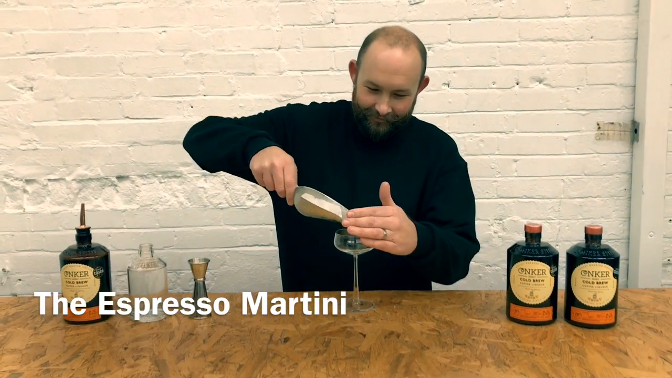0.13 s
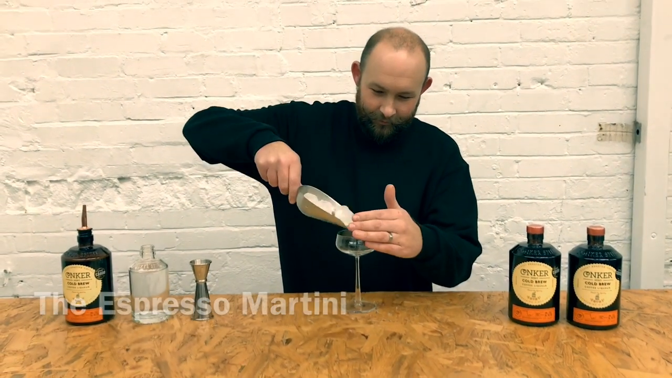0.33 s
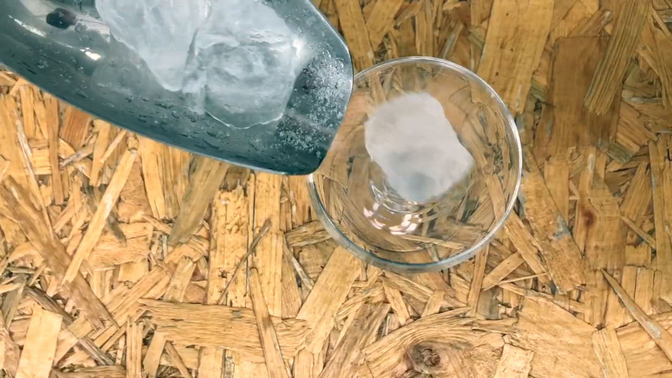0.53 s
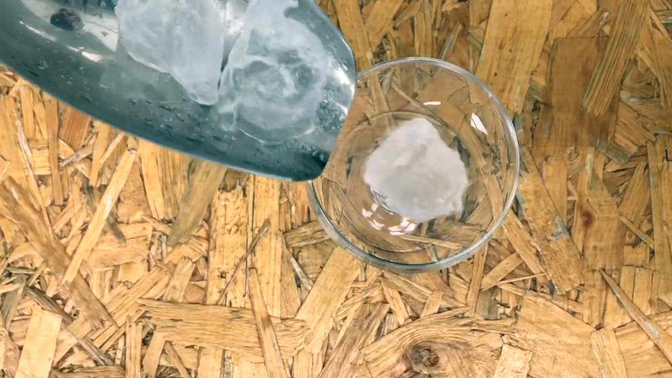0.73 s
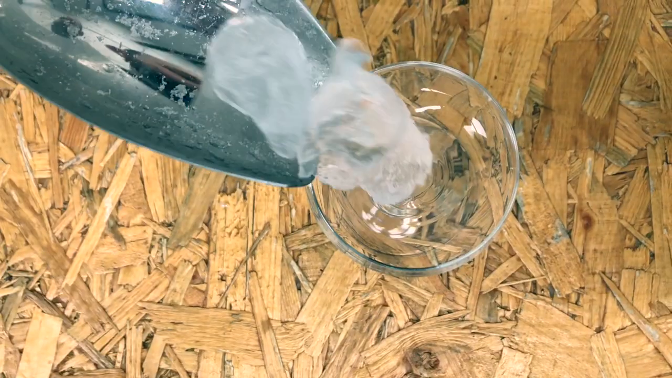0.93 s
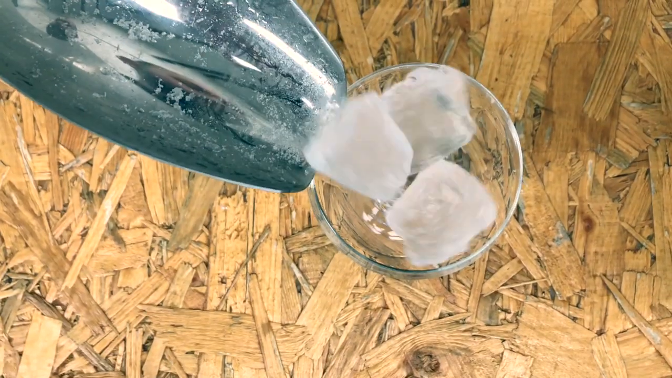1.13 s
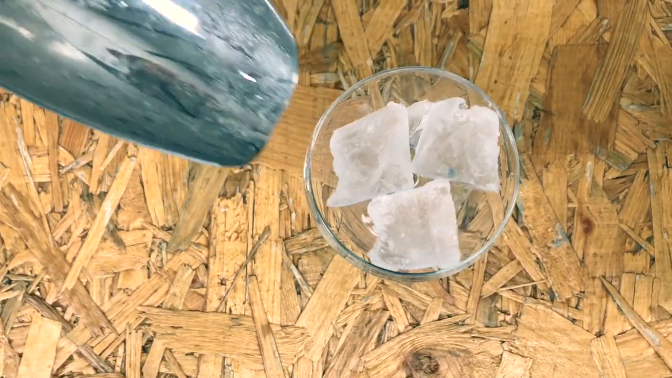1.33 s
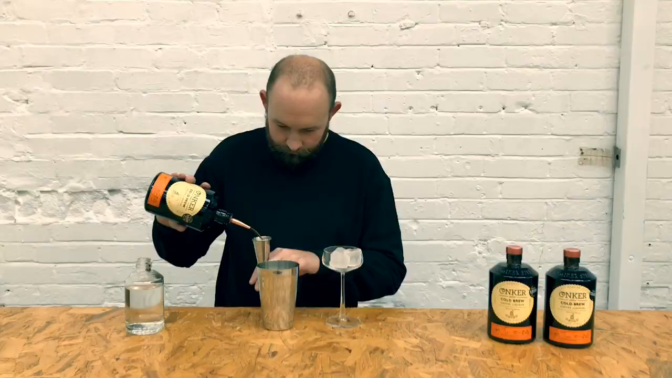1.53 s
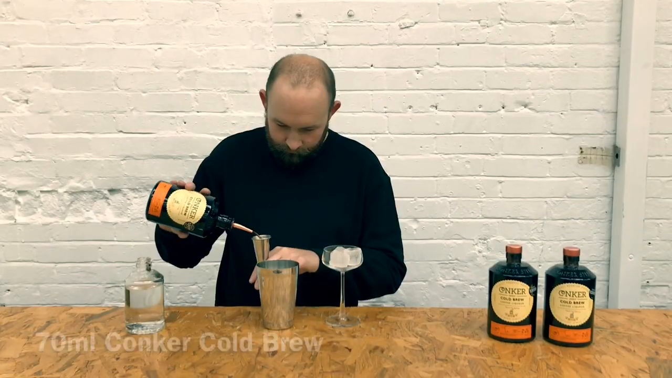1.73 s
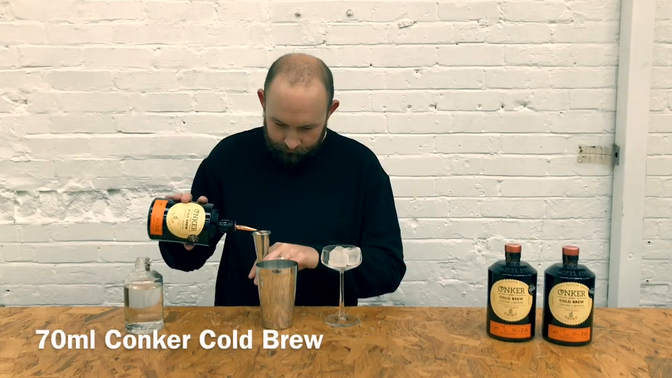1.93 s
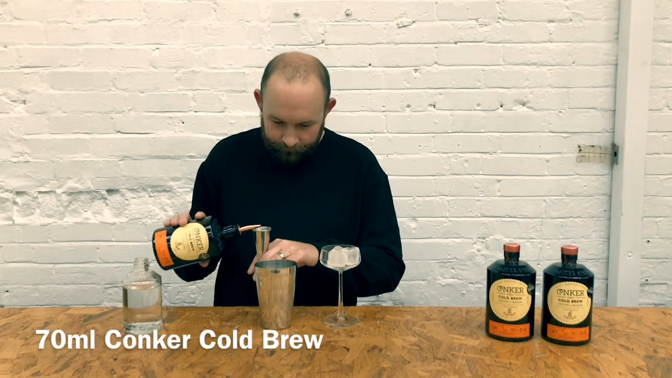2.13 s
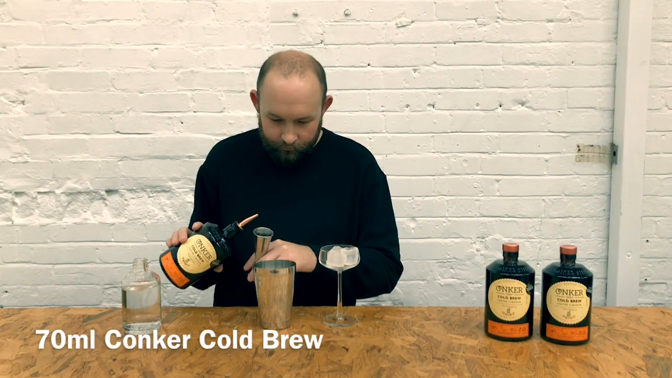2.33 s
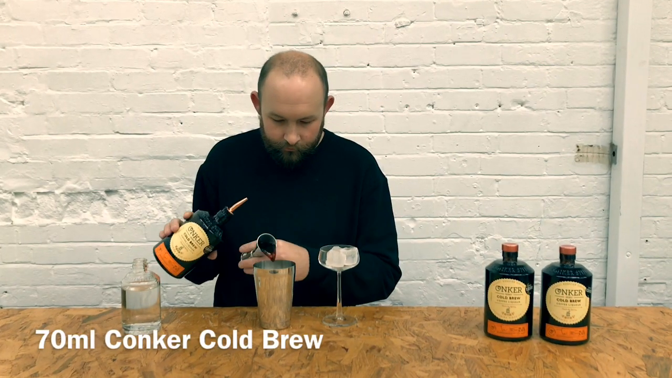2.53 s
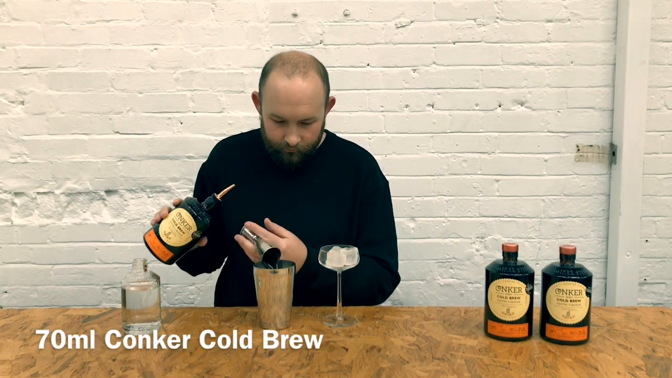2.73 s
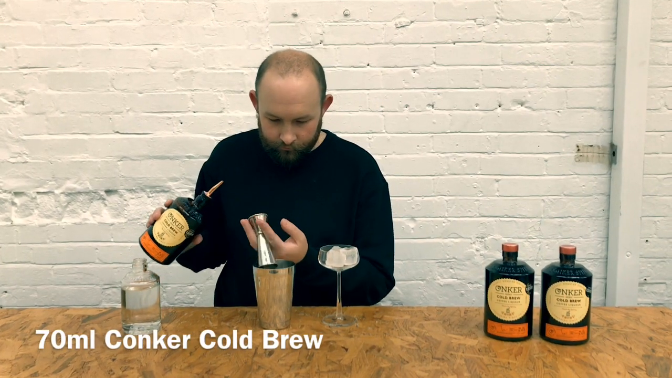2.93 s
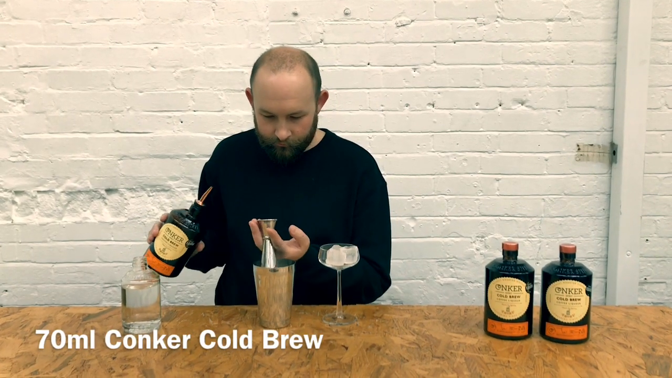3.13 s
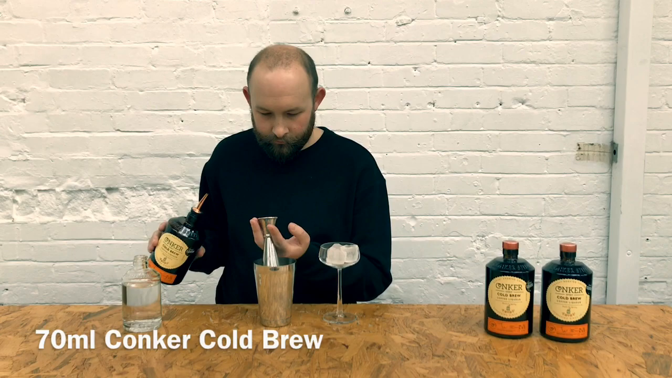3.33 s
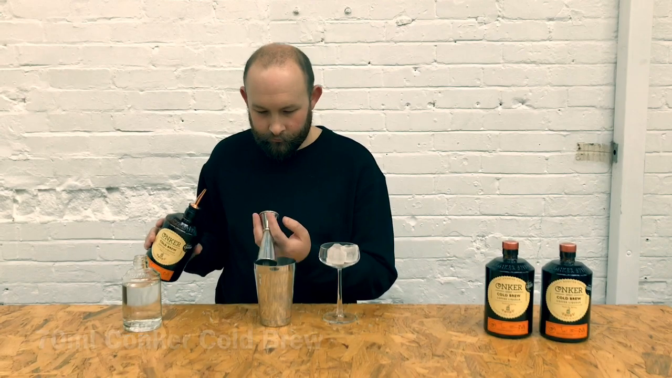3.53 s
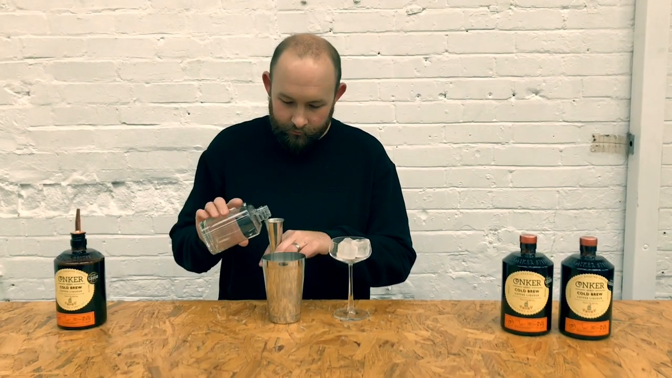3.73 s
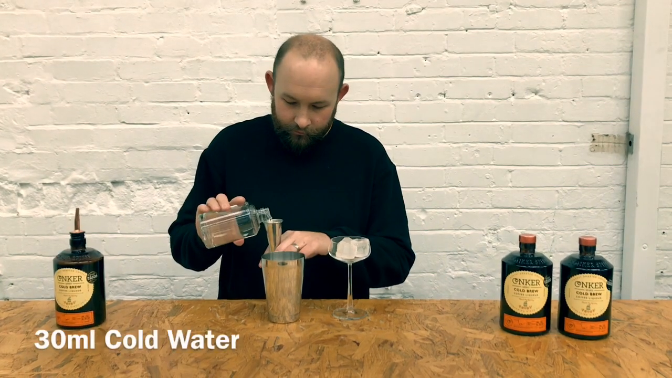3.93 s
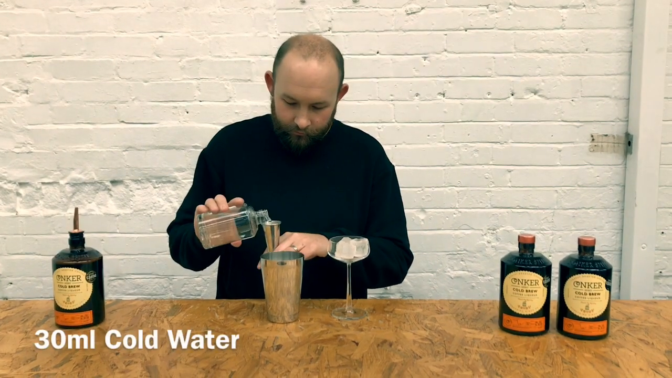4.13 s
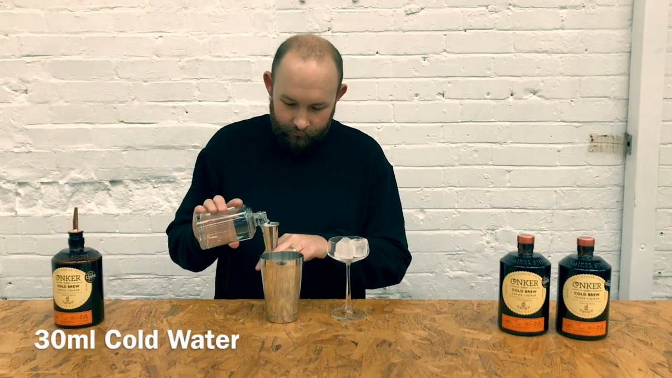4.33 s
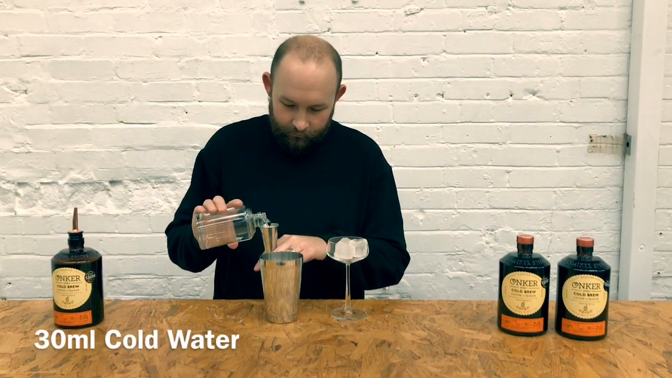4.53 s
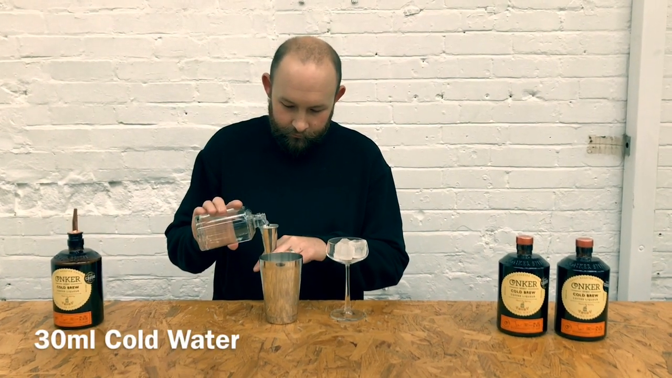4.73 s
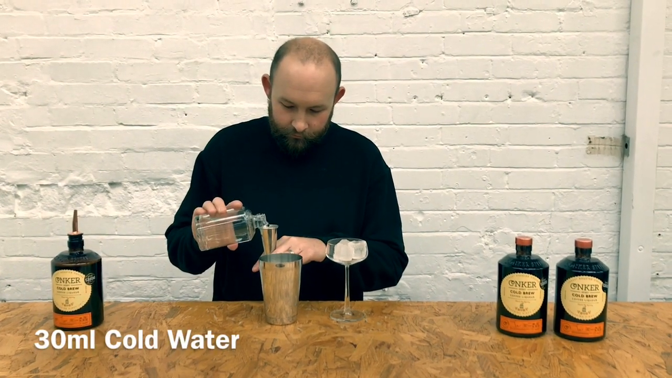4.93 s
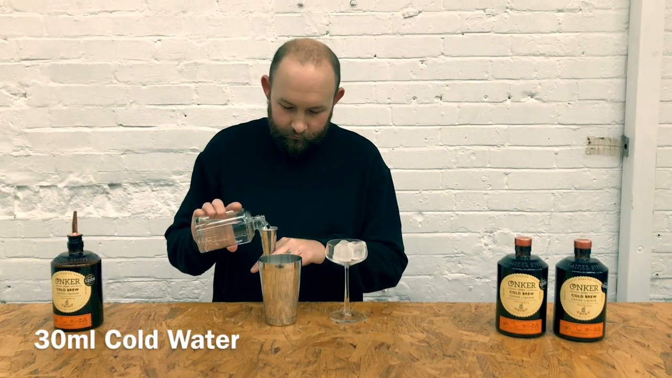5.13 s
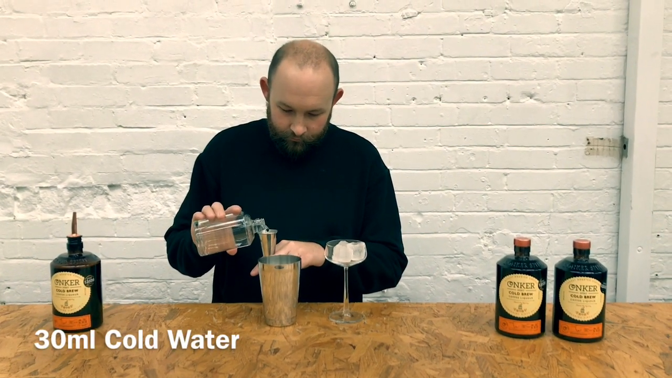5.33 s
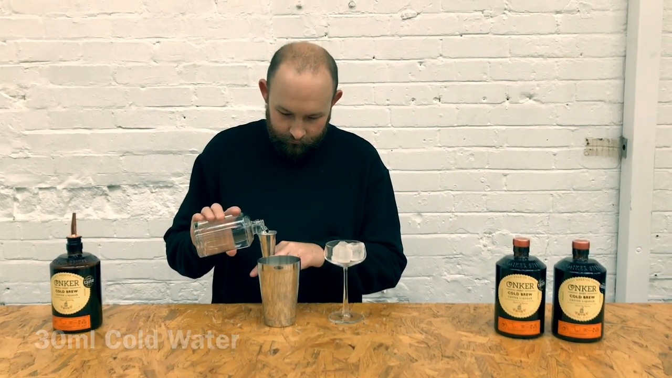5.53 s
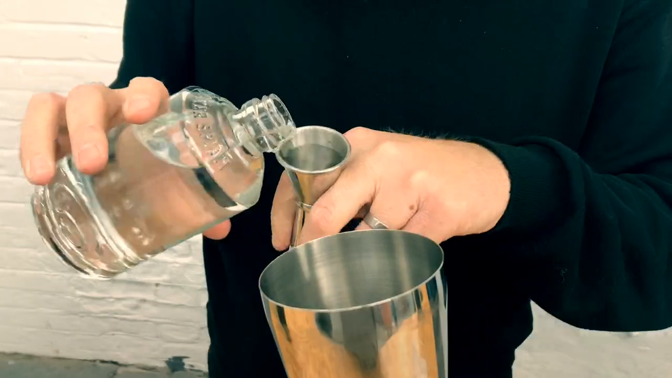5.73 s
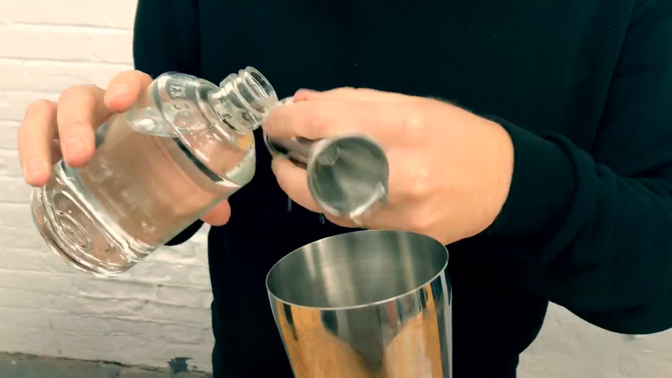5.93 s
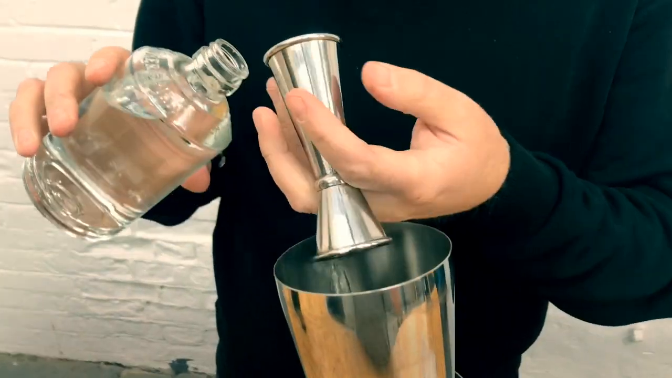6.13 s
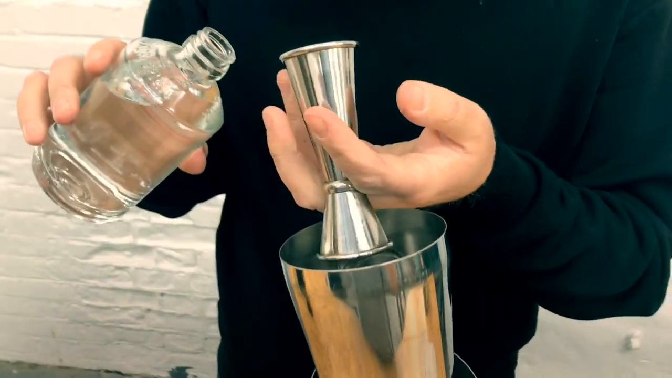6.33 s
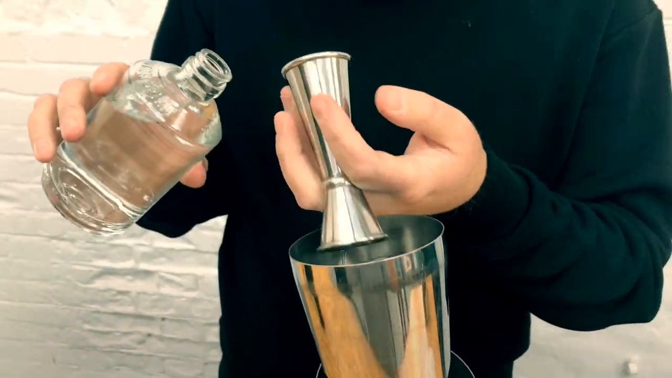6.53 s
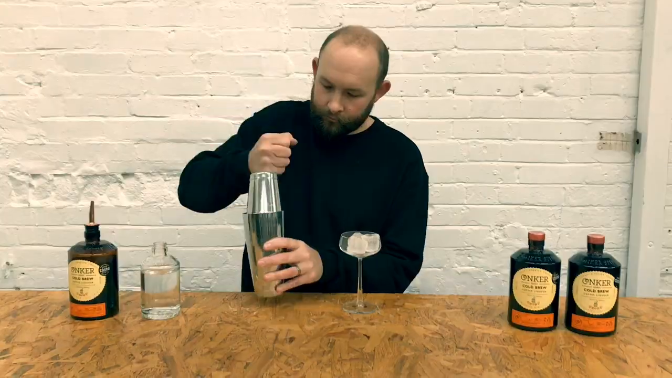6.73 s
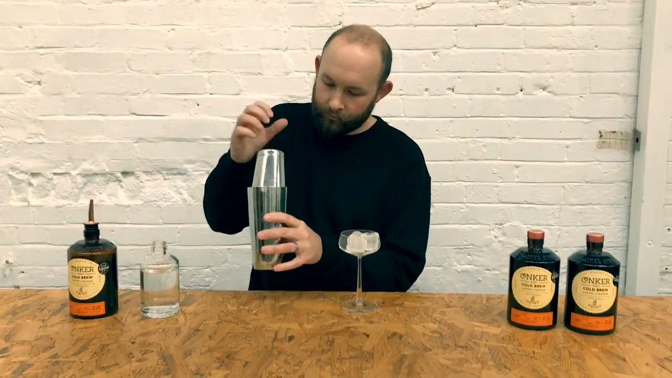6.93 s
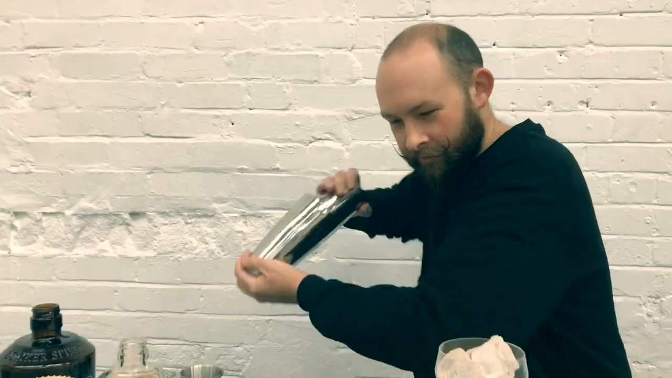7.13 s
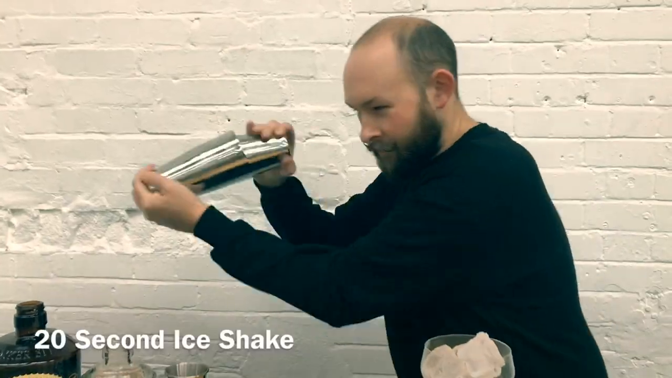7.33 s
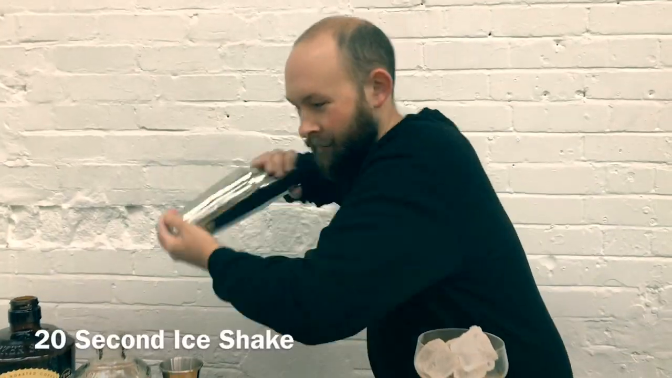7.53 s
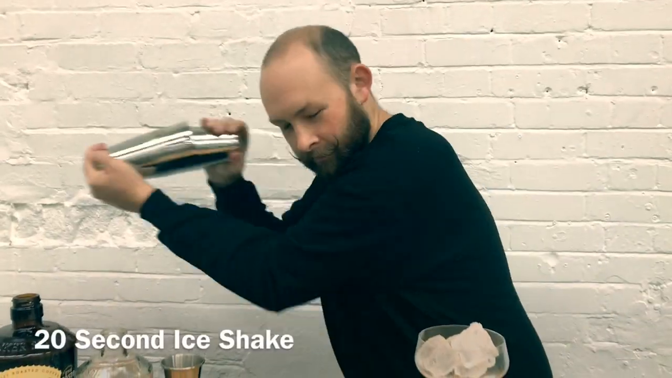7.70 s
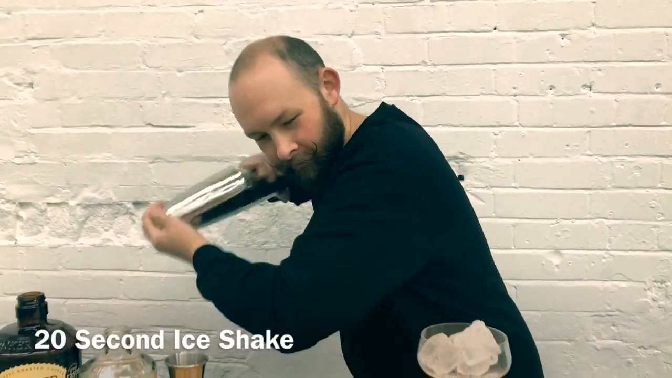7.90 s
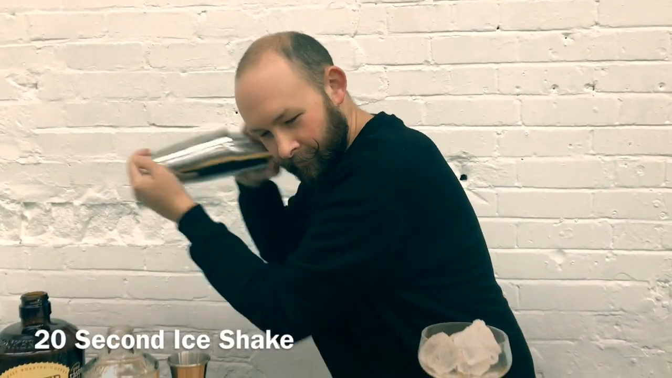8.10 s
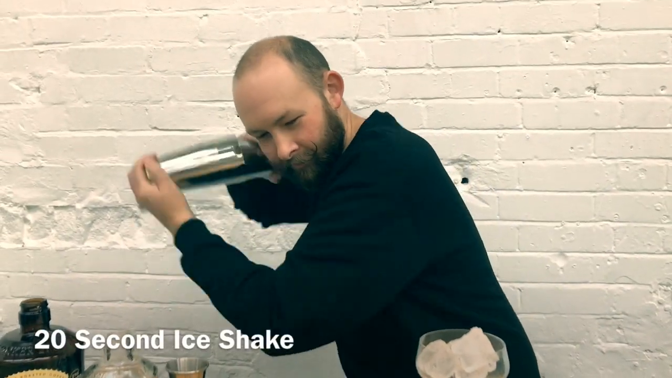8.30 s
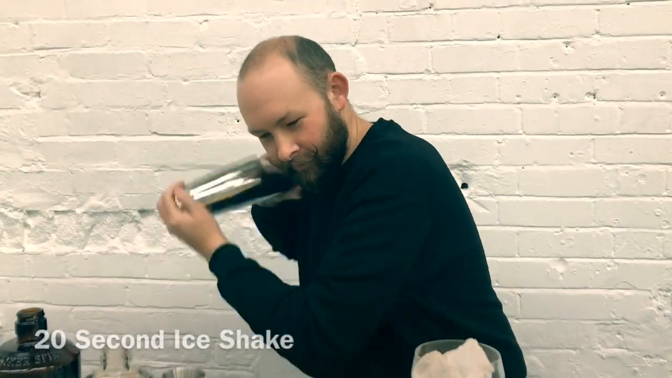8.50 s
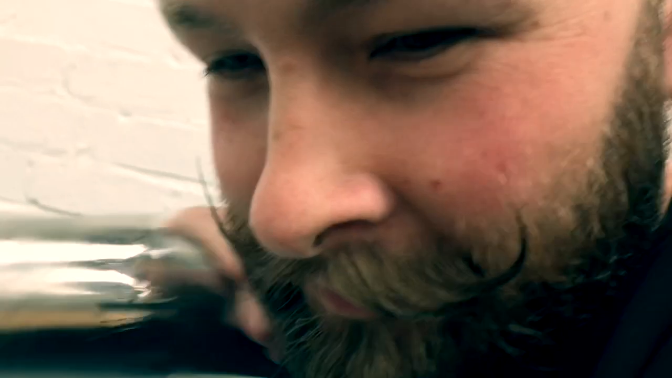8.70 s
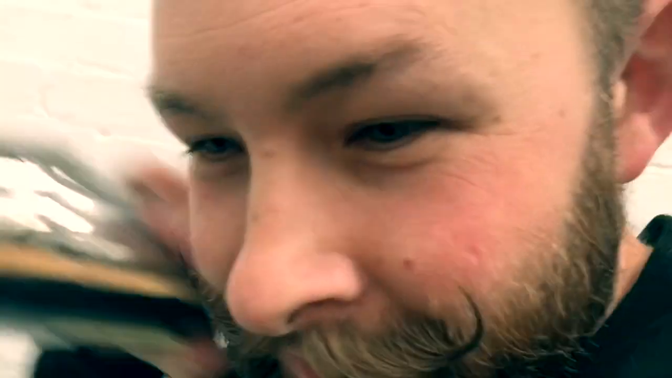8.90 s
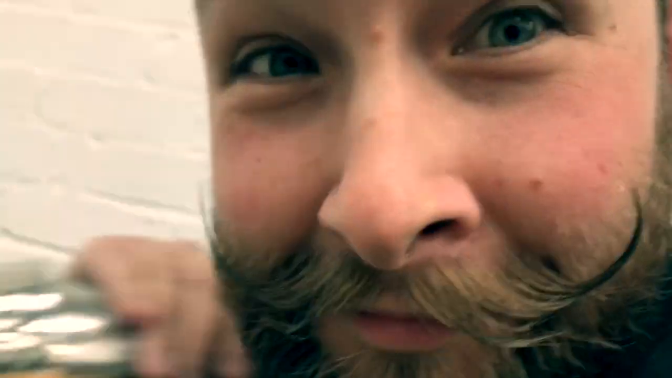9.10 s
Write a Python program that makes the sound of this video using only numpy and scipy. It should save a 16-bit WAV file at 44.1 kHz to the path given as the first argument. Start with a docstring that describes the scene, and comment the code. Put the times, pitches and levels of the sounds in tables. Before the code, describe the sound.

Ice cubes slide off a metal scoop and clink into a stemmed glass, liquid trickles through a steel measure, then ice rattles hard in a shaker.

```python
"""Ice is the main sound: it slides off a metal scoop, clinks into a stemmed glass, and is later shaken hard.
Liqueur and water run through a steel jigger into a shaker; its lid is slapped on, then the load hits
the two ends by turns, about eleven blows a second. Contacts are noise bursts, struck objects are dying
tones, and liquid is made of rising bubble tones and patter. Faint air and a room surround it all.
Eight short sections are joined by quick fades. Table levels are relative; the functions trim them."""
import sys
import numpy as np
from scipy import signal
from scipy.io import wavfile

SR = 44100
rng = np.random.default_rng(int(sys.argv[2]) if len(sys.argv) > 2 else 0)


def store_pcm(level_fs):
    """Save levels as 16-bit WAV."""
    pcm = np.round(np.clip(level_fs, -1, 1) * 32767).astype(np.int16)
    wavfile.write(sys.argv[1], SR, np.atleast_2d(pcm).T)


N = 403956
TIME = np.arange(N) / SR
AGE = TIME[:SR // 2]  # time since a blow, in s


def amp(db):
    """Turns decibels into a gain."""
    return 10 ** (np.asarray(db) / 20)


def unit(x):
    """Scales a sound to rms 1."""
    return x / np.sqrt(np.mean(x ** 2) + 1e-20)


def blow(x):
    """Scales a struck sound to rms 1 over its first hundredth of a second."""
    return x / np.sqrt(np.mean(x[:441] ** 2) + 1e-20)


def read(points, hz):
    """Reads between the points of a table on a log-frequency axis."""
    f, value = np.transpose(points)
    return np.interp(np.log(hz + 1), np.log(np.sort(f) + 1), value)


def add(mix, s, sound):
    """Lays a sound into the mix at time s."""
    part = mix[max(round(s * SR), 0):][:len(sound)]
    part += sound[:len(part)]


def fade(t, t60):
    """Falls 60 dB in t60 seconds."""
    return np.exp(-np.log(1000) * t / np.maximum(t60, 1e-4))


def swell(start, length, rise_s, t60):
    """Rises from start, and begins to die away once length has passed."""
    age = np.maximum(TIME - start, 0)
    rise = np.minimum(age / max(rise_s, 1e-3), 1)
    return rise * fade(np.clip(age - length, 0, 2 * t60), t60)


def colour(x, spectrum, size=4096):
    """Causal filter with the given spectrum that keeps the power of white noise."""
    hz = abs(np.fft.fftfreq(size, 1 / SR))
    log_gain = np.log(amp(read(spectrum, hz)) + 1e-5)
    # the Hilbert transform of the log gain supplies the phase of a causal filter
    taps = np.fft.ifft(np.exp(np.conj(signal.hilbert(log_gain)))).real[:size // 2]
    return signal.oaconvolve(x, taps / np.linalg.norm(taps))[:len(x)]


def ring(modes, scatter_db):
    """A struck object is a sum of dying tones; each blow shares its energy a little differently."""
    hz, db, t60 = np.transpose(modes)[:, :, None]
    signs = rng.choice([-1, 1], hz.shape)
    gains = signs * amp(db + scatter_db * rng.standard_normal(hz.shape))
    tones = gains * fade(AGE, t60) * np.sin(2 * np.pi * hz * AGE)
    return blow(tones.sum(0))


def two_spots(modes):
    """Gives the tones of one object as they sound from each of two strike points."""
    hz, t60, first_db, second_db = np.transpose(modes)
    return np.c_[hz, first_db, t60], np.c_[hz, second_db, t60]


def crack(t60):
    """A contact makes a short burst without pitch."""
    return blow(rng.standard_normal(len(AGE)) * fade(AGE, t60))


def chink(t60, count=14):
    """A lump of ice has its own short, irregular tones."""
    hz = rng.uniform(3000, 15500, count)
    tone_t60 = t60 * rng.uniform(.5, 1.5, count)
    return ring(np.c_[hz, np.zeros(count), tone_t60], scatter_db=3)


def collisions(per_s, spread_db, t60, count=12):
    """A dense rain of small contacts, drawn from a dozen different bursts."""
    at = rng.integers(0, N, (count, int(per_s * N / SR / count) + 1))
    out = np.zeros(N)
    for places in at:
        size = np.minimum(rng.exponential(1, len(places)), 3.5)
        train = np.zeros(N)
        train[places] = amp(spread_db * size)
        out += signal.oaconvolve(train, crack(t60)[:SR // 50])[:N]
    return unit(out)


def bubble(hz, t60, rise, swell_s):
    """An air pocket rings and climbs in pitch as it nears the surface."""
    t = AGE[:SR // 4]
    tone = np.sin(2 * np.pi * hz * (t + rise * t ** 2 / 2))
    tone = tone * fade(t, t60) * (1 - np.exp(-t / swell_s))
    return tone / abs(tone).max()


# The sections, where room share grows with distance:
# t/s, room tone level/dB, close tone level/dB, room share level/dB
TAKES = [(0, -62, -70, -0.5), (0.591, -55.5, -78, -15), (1.62, -62.5, -69, 0.5), (3.679, -59.5, -70, -2.5),
         (5.717, -66, -52, -20), (6.715, -57, -79, -14), (7.182, -56.5, -78, -14.5),
         (8.751, -54, -55, -22.5)]


def by_take(column):
    """A setting holds for the length of each section."""
    start = np.transpose(TAKES)[0]
    section = np.maximum(np.searchsorted(start, TIME, "right") - 1, 0)
    return amp(column[section])


# Spectrum of the room's air: f/Hz, level/dB
ROOM_TONE = [(15, -37.5), (25, -12.5), (54, -6), (101, -15.5), (176, -20), (293, -21.5), (344, -33),
             (404, -29.5), (529, -28.5), (1310, -45.5), (2430, -38), (3630, -39.5), (15000, -46.5)]
# Spectrum of the same air heard from close by: f/Hz, level/dB
CLOSE_TONE = [(15, -29), (25, -2), (71, 0), (224, -5.5), (264, -8), (301, -14.5), (363, -8.5), (475, -12.5),
              (1240, -12.5), (1860, -22.5), (15000, -47)]


def air():
    """Steady noise of the air, blended from a room colour and a close colour in each section."""
    _, far_db, close_db, _ = np.transpose(TAKES)
    far, close = rng.standard_normal((2, N))
    return by_take(far_db) * colour(far, ROOM_TONE) + by_take(close_db) * colour(close, CLOSE_TONE)


def sliding(slides):
    """How hard the ice is sliding at each moment."""
    rise_s, t60 = 0.012, .3
    return sum(amp(db) * swell(s, length, rise_s, t60) for s, length, db in slides)


# Ice striking the scoop: t/s, tick level/dB, ring level/dB
SCOOP_HITS = [(0.3357, -54.5, -62), (0.4807, -35, -60), (0.6038, -37, -38), (0.8744, -39, -43.5),
              (0.9238, -17, -21), (0.9392, -26, -30), (0.9617, -19, -19.5)]
# Tones of the scoop: f/Hz, level/dB, t60/s
SCOOP_MODES = [(1450, -12, .08), (3738, 0, .1), (3960, -6, .06), (4200, -5, .07), (4400, -7, .06),
               (5772, -11, .15), (6821, -9, .09), (8570, -15, .1), (9593, -14, .1), (10640, -14, .12),
               (11980, -14, .1), (13050, -11, .12)]
# Cubes sliding down the scoop: start t/s, length t/s, level/dB
SLIDES = [(0.321, 0.051, -58), (0.478, 0.0096, -48.5), (0.597, 0.016, -45), (0.87, 0.096, -43),
          (0.918, .05, -38.5)]
# Spectrum of ice scraping on the scoop: f/Hz, level/dB
SCRAPE = [(300, -15.5), (1000, -2.5), (2500, -6), (4100, -1.5), (5200, -5), (8000, -6.5), (12500, -7.5),
          (16000, -13)]
# Spectrum of a tick on metal, for scoop and jigger: f/Hz, level/dB
TICK = [(200, -16), (700, -8.5), (1800, -8.5), (3000, -0.5), (5000, 0), (8000, -8.5), (12000, -10.5),
        (16000, -6.5)]


def scoop():
    """Cubes scrape down the scoop and strike its sides; rubbing and blows excite the same tones."""
    ticks, rings = np.zeros((2, N))
    for s, tick_db, ring_db in SCOOP_HITS:
        add(ticks, s, amp(tick_db - 10.5) * crack(t60=0.06))
        add(rings, s, amp(ring_db) * ring(SCOOP_MODES, scatter_db=4.5))
    friction = collisions(per_s=1800, spread_db=6.5, t60=0.0053)
    singing = unit(signal.oaconvolve(friction, ring(SCOOP_MODES, scatter_db=0))[:N])
    scrape = sliding(SLIDES) * (amp(-2.0) * colour(friction, SCRAPE) + amp(-12) * singing)
    return colour(ticks, TICK) + rings + scrape


# Ice landing in the glass: t/s, knock level/dB, ring level/dB, contact height (0 base to 1 wall)
CUBES = [(0.561, -27, -42.5, 0.043), (0.639, -6, -14, 0.0063), (0.678, -23.5, -41.5, .1),
         (0.692, -26.5, -54, .1), (0.733, -20.5, -31, 0.04), (0.768, -28.5, -52.5, 0.091),
         (1.039, -19.5, -33.5, 0.13), (1.078, -25, -22.5, 0.33), (1.097, -18.5, -43, 0.26),
         (1.143, -13, -42, 0.94), (1.163, -16.5, -10.5, 0.62), (1.172, -9.5, -18.5, .45),
         (1.198, -17, -41.5, .5), (1.211, -16, -39, 0.41), (1.256, -10, -17.5, 0.6),
         (1.261, -11, -27, 0.63), (1.27, -9.5, -21.5, 1), (1.281, -11, -19, 0.67), (1.3, -17.5, -24, 0.61),
         (1.309, -13.5, -12, 0.48), (1.347, -14, -57, 0.62), (1.371, -23, -48, 0.52),
         (1.408, -20.5, -33, 0.56), (1.43, -22, -61, 0.64), (1.478, -34.5, -53.5, 0.86),
         (1.542, -38, -54, 1)]
# Tones of the glass: f/Hz, t60/s (before the ice damps it), level/dB struck at base, level/dB struck on wall
GLASS = [(1365, .25, -38, -10), (1553, .25, -24, 1), (1660, .25, -30, -6), (2388, .26, -40, -7),
         (3805, .27, -28, -4), (4095, .25, -14, -4), (4132, .18, -4, -1), (4543, .11, -30, -2),
         (5232, .14, -30, -9), (5538, .24, -45, -4), (5771, .18, -45, -7), (6136, .14, -40, -11),
         (6812, .2, -40, -13), (8247, .11, -40, -6), (8660, .11, -1, -14), (9905, .18, -45, -9),
         (10350, .11, -17, -8), (11642, .14, -4, -16), (11950, .12, -35, -14), (12595, .13, 1, -13),
         (13045, .12, -3, -13), (14836, .12, -35, -16), (15360, .15, -11, -11)]
# Tones of the wooden counter: f/Hz, level/dB, t60/s
COUNTER = [(85, -16.5, 0.3), (116, -9.5, 0.16), (160, 2, 0.083), (200.5, -0.5, 0.17), (265.3, 5.5, 0.045)]
# Spectrum of a cube's knock: f/Hz, level/dB
KNOCK = [(100, -19.5), (400, -8.5), (900, 2), (2000, 0), (3200, -3), (5000, -8), (7000, -35.5),
         (11000, -22.5), (16000, -19.5)]
CHINK_DB = -19  # the cube's own ring, relative to its knock
THUD_DB, THUD_LOSS_DB = -8, 13  # counter under a blow on the base, and how much less from the wall
DAMPING_T60 = .55  # s; ice lying against the wall shortens its ring


def ice_in_glass():
    """Each cube knocks and rings the bowl; the lower it lands, the more its stem thumps the counter."""
    knocks, rings = np.zeros((2, N))
    base, wall = two_spots(GLASS)
    for s, knock_db, ring_db, height in CUBES:
        height = np.clip(height, 0, 1)
        bowl = amp(-4.5) * (1 - height) * ring(base, scatter_db=0.5)
        bowl += height * ring(wall, scatter_db=2.0)
        knock = crack(t60=0.023) + amp(-19.5) * crack(t60=0.08)
        thud = ring(COUNTER, scatter_db=3.5) * (1 - np.exp(-AGE / 0.0037))
        add(knocks, s, amp(knock_db - 10.0) * knock)
        add(rings, s, amp(ring_db) * bowl * fade(AGE, DAMPING_T60))
        add(rings, s, amp(knock_db + CHINK_DB) * chink(t60=0.03, count=8))
        add(rings, s, amp(knock_db + THUD_DB - THUD_LOSS_DB * height) * thud)
    return colour(knocks, KNOCK) + rings


# Cubes skidding round the bowl as they settle: start t/s, length t/s, level/dB
SKIDS = [(0.745, 0.043, -47), (1.03, 0.077, -46), (1.16, 0.2, -43.5), (1.44, 0.11, -60)]
# Spectrum of ice grinding on glass: f/Hz, level/dB
GRIND = [(300, -11.5), (1000, -1.5), (1700, 3.5), (2600, -2.5), (4000, 2), (5500, -9), (9000, -13),
         (16000, -14)]


def chatter(count=36):
    """Skidding cubes grind round the bowl, keep it singing, and chink lightly against each other."""
    motion = sliding(SKIDS)
    grinding = motion * collisions(per_s=350, spread_db=4, t60=0.00594)
    _, wall = two_spots(GLASS)
    bowl = ring(wall, scatter_db=0)
    singing = signal.oaconvolve(grinding, bowl / np.linalg.norm(bowl))[:N]
    out = amp(-3.5) * colour(grinding, GRIND) + amp(-2.5) * singing
    # random moments between the second landing and the last
    for s, size in rng.uniform([CUBES[1][0], -1], [CUBES[-1][0], 1], (count, 2)):
        add(out, s, motion[int(s * SR)] * amp(-0.5 + 3.3 * size) * chink(t60=0.037))
    return out


# Liquid running into steel: start t/s, length t/s, splash level/dB, bubbling level/dB
POURS = [(1.643, 0.18, -68.5, -69.5), (1.831, 0.057, -66, -79), (2.773, 0.11, -57, -72),
         (2.911, 0.026, -44, -51.5), (3.085, 0.032, -62.5, -67), (4.427, 0.057, -68, -59),
         (4.528, 0.09, -64, -76), (4.861, 0.72, -92, -69), (6.27, 0.047, -52.5, -58),
         (6.437, 0.043, -52, -44.5)]
# Spectrum of the splash: f/Hz, level/dB
SPLASH = [(300, -7), (700, -0.5), (1500, -11.5), (3500, 5.5), (6000, 4.5), (10000, -3.5), (16000, -8)]
# The larger drops and bubbles: t/s, level/dB, f/Hz (at the start of each)
DROPS = [(1.7232, -52, 1034), (2.1287, -58.5, 2100), (2.786, -46, 3280), (2.84, -51, 3390),
         (2.883, -41, 1820), (2.926, -34, 4370), (4.2214, -33.5, 3005), (4.239, -37, 3350),
         (4.334, -53.5, 1810), (4.484, -49, 1300), (4.5276, -47, 1010), (4.591, -47, 1537),
         (4.6832, -54, 4200), (4.876, -47, 1814), (5.01, -51, 1670), (5.053, -47, 1440),
         (5.4175, -42, 2420), (5.4442, -56, 2440)]
# Large air pockets: t/s, level/dB, f/Hz (at the start of each)
GLUGS = [(2.879, -41.5, 689), (4.298, -50, 363), (4.536, -46, 325), (4.825, -50, 332), (5.124, -47.5, 328)]
DROP_T60, GLUG_T60 = 0.029, 0.042  # s
POUR_RISE_S, POUR_T60 = 0.0073, 0.52  # s; the stream arrives quickly and dribbles away


def liquid(count=36):
    """A thin stream splashes and traps small bubbles; drops plink and the bottle glugs."""
    splash, bubbling, froth = np.zeros((3, N))
    for s, length, splash_db, bubbling_db in POURS:
        flow = swell(s, length, POUR_RISE_S, POUR_T60)
        splash += amp(splash_db) * flow
        bubbling += amp(bubbling_db) * flow
    # each bubble pitch is born about seven times a second; smaller bubbles die sooner
    for hz in np.geomspace(1100, 3400, count):
        size = np.minimum(rng.exponential(1, N), 3)
        births = (rng.random(N) < 7 / SR) * amp(1.8 * size)
        froth += signal.oaconvolve(births, bubble(hz, t60=60 / hz, rise=1.6, swell_s=0.00043))[:N]
    out = amp(-7.5) * bubbling * unit(froth)
    patter = colour(collisions(per_s=900, spread_db=3.5, t60=.012), SPLASH)
    out += amp(-1.5) * splash * patter
    for s, db, hz in DROPS:
        add(out, s, amp(db - 2.5) * bubble(hz, DROP_T60, rise=0.29, swell_s=0.00026))
    for s, db, hz in GLUGS:
        add(out, s, amp(db - 4.5) * bubble(hz, GLUG_T60, rise=.3, swell_s=0.025))
    return out


# Dull bumps of hands and bottle, and the palm on the lid: t/s, level/dB
BUMPS = [(2.224, -51), (2.8, -52.5), (3.237, -49), (3.555, -48.5), (6.491, -36.5), (6.81, -22),
         (6.829, -35)]
# Spectrum of a bump's puff: f/Hz, level/dB
BUMP_PUFF = [(30, -3), (70, -17), (130, 0.5), (220, -3.5), (400, -20), (800, -20.5), (3000, -42)]


def hands(thump_hz=125):
    """A soft, dull blow is a low push and a puff of noise."""
    push, puff = np.zeros((2, N))
    for s, db in BUMPS:
        thump = np.sin(2 * np.pi * thump_hz * AGE) * fade(AGE, 0.061)
        add(push, s, amp(db - 18) * blow(thump))
        add(puff, s, amp(db - 3) * crack(t60=0.085))
    return push + colour(puff, BUMP_PUFF)


# The jigger touching bottle or shaker: t/s, tick level/dB, place
TAPS = [(3.6954, -42.5, "cone"), (3.8738, -39.5, "neck"), (3.9283, -33.5, "neck"), (4.13, -39.5, "neck"),
        (4.6159, -59.5, "lip"), (5.8774, -44, "lip"), (5.9096, -19, "lip"), (6.061, -46, "lip"),
        (6.134, -4, "cone"), (6.242, -34, "cone"), (6.4249, -29, "rim"), (6.44, -17, "rim"),
        (6.4953, -39, "neck")]
# What rings at each place, relative to the tick:
# place: bottle neck level/dB, cone level/dB, lip level/dB, shaker rim level/dB
CONTACTS = {"neck": (-6, -23, -19, -35), "lip": (-1, -38.5, -10, -21), "cone": (-35.5, -12, -18, -53.5),
            "rim": (-18, -25, -25, -7.5)}
# Tones of the jigger: f/Hz, t60/s, level/dB struck on cone, level/dB struck on lip
JIGGER_MODES = [(4196, .23, 0, -30), (4204, .5, -22, -45), (4974, .3, -48, -15), (5776, .35, -9, -28),
                (5850, .35, -22, -26), (6401, .2, -24, -24), (6876, .22, -20, -20), (7325, .14, -20, 0),
                (7370, .42, -18, -15), (7590, .16, -13, -8), (8555, .13, -21, -3), (9647, .11, -5, -22),
                (10968, .22, -11, -32), (12540, .13, -5, -24), (13370, .2, -16, -24), (14950, .2, -26, -35)]
# Tones of the bottle neck: f/Hz, level/dB, t60/s
NECK = [(635, -18, .13), (1255, -4, .1), (1400, 3, .07), (1560, -6, .06), (1850, -9, .08), (2175, -4, .08),
        (2295, -2, .11), (2520, -4, .09)]
# Tones of the open shaker: f/Hz, level/dB, t60/s
RIM = [(3670, -7, 0.18), (4425, 5.5, .13), (4830, -2, .056), (5100, -2, 0.17), (5450, -15, 0.44),
       (6700, -1.5, .094), (6770, -9.5, 0.31), (7830, -6, .1), (9092, -8.5, .08), (11550, -6, 0.15),
       (14230, -14.5, .12)]


def jigger():
    """The steel measure pings; bottle, shaker and both parts of the jigger answer one touch."""
    ticks, rings = np.zeros((2, N))
    cone, lip = two_spots(JIGGER_MODES)
    for s, tick_db, place in TAPS:
        neck_db, cone_db, lip_db, rim_db = CONTACTS[place]
        add(ticks, s, amp(tick_db - 14.0) * crack(t60=0.026))
        answers = (NECK, neck_db - 6), (RIM, rim_db - 7), (cone, cone_db - 0.5), (lip, lip_db - 2.5)
        for modes, db in answers:
            add(rings, s, amp(tick_db + db) * ring(modes, scatter_db=1))
    return colour(ticks, TICK) + rings


# The load of ice reaching the cup and the lid in turn:
# t/s, level/dB, cushion (0 ice meets bare steel, 1 liquid arrives first)
STROKES = [(7.205, -10.5, 0.81), (7.2836, -8.5, 0.78), (7.382, -7.5, .05), (7.4628, -7.5, 0.26),
           (7.5612, -5.5, 0.7), (7.651, -9.5, 0.5), (7.7534, -10, 0.1), (7.8229, -10, 0.85),
           (7.919, -6.5, 0.93), (8.0096, -11.5, 0.18), (8.1216, -12.5, 0.16), (8.1928, -10, 0.83),
           (8.2721, -6, 0.61), (8.3538, -11.5, 0.74), (8.4724, -9, .01), (8.5365, -9, 0.63),
           (8.6393, -8.5, 0.56), (8.7927, -4, 1), (8.9096, -9, 0.92), (8.9966, -8.5, 0.89),
           (9.1031, -4.5, 0.27)]
# Single sharp clacks of ice on steel, around the slap on the lid and through the shake: t/s, level/dB
CLACKS = [(6.808, -7.5), (6.828, -9.5), (6.9426, -21), (6.9576, -16.5), (7.1012, -27.5), (7.1909, -5),
          (7.205, 1.5), (7.2845, -1), (7.4636, -5), (7.4717, -1.5), (7.6505, -4.5), (8.089, -6.5),
          (8.106, -9), (8.45, -5), (8.7677, -8), (8.7973, -3.5), (8.815, -11), (8.8932, -0.5),
          (8.972, -2.5), (9.0134, -5.5), (9.0907, -0.5), (9.1014, 1.5)]
# Ice and liquid tumbling, after the lid slap and through the shake: start t/s, length t/s, level/dB
TUMBLES = [(6.817, 0.035, -36.5), (6.886, 0.059, -33.5), (6.996, 0.14, -59), (7.184, 1.575, -30),
           (8.755, .39, -30)]
# Spectrum of ice in the steel shaker: f/Hz, level/dB
SHAKER_ICE = [(25, -62), (60, -38), (150, -12), (300, -10.5), (560, -5.5), (1100, -3.5), (1800, 0),
              (2400, -2.5), (3400, 0.5), (4300, -2), (4900, -4), (6200, -3.5), (7800, -8), (9500, -7.5),
              (10600, -12.5), (12700, -10.5), (16000, -17)]
# Spectrum of liquid thrown against an end: f/Hz, level/dB
SLOSH = [(30, -42), (100, -13.5), (300, -10), (560, 8), (750, 4.5), (950, 3), (1500, -6), (3000, -11),
         (12000, -49)]
CUP_HZ, LID_HZ = 1712, 1917  # pitches of the two steel ends
PILE_RISE_S, CUP_FALL_S, LID_FALL_S = 0.0029, 0.027, 0.017  # cubes settle sooner in the narrow lid
END_RING_DB, FAR_END_DB = -1.5, -9  # ring of the struck end, and the other end relative to it
MUFFLE_DB = 24  # ring lost under a full cushion
SLOSH_DB, DRY_DB = -16, -21.5  # liquid's blow under a full cushion, and its change with none
TUMBLE_RISE_S, TUMBLE_T60 = 0.0051, 0.39  # s


def shaker():
    """Cubes pile into each end in a burst of collisions and ring the steel, unless liquid cushions it."""
    force, weight, clacks, rings = np.zeros((4, N))
    for k, (s, db, cushion) in enumerate(STROKES):
        if k % 2:
            near_hz, far_hz, fall_s = LID_HZ, CUP_HZ, LID_FALL_S
        else:
            near_hz, far_hz, fall_s = CUP_HZ, LID_HZ, CUP_FALL_S
        cushion = np.clip(cushion, 0, 1)
        pile = (1 - np.exp(-AGE / PILE_RISE_S)) * np.exp(-AGE / fall_s)
        pile /= pile.max()
        add(force, s, amp(db - 11.5) * pile)
        add(weight, s, amp(db + SLOSH_DB + DRY_DB * (1 - cushion)) * pile)
        ring_db = db + END_RING_DB - MUFFLE_DB * cushion
        for hz, end_db in (near_hz, ring_db), (far_hz, ring_db + FAR_END_DB):
            # liquid on the wall detunes the steel a little at each blow
            detuned_hz = hz * (1 + .005 * rng.standard_normal())
            tone = np.sin(2 * np.pi * (detuned_hz * AGE + rng.random()))
            add(rings, s, amp(end_db) * tone * fade(AGE, 0.16) * (1 - np.exp(-AGE / 0.001)))
    for s, db in CLACKS:
        clack = crack(t60=0.017) + amp(-5.5) * crack(t60=0.12) + amp(-5) * chink(t60=0.036)
        add(clacks, s, amp(db - 17.5) * clack)

    tumbling = sum(amp(db) * swell(s, length, TUMBLE_RISE_S, TUMBLE_T60) for s, length, db in TUMBLES)
    # whole cubes knock now and then; chips and slush make the dense rattle
    slush = amp(-1) * collisions(per_s=1800, spread_db=0, t60=0.0037)
    cubes = amp(-7.5) * collisions(per_s=70, spread_db=-1.0, t60=0.012)
    swirl = tumbling * (slush + cubes)
    rattle = amp(-0.5) * collisions(per_s=2400, spread_db=0, t60=0.01)
    knocks = amp(-6) * collisions(per_s=260, spread_db=3, t60=.013)
    ice = force * (rattle + knocks) + swirl + clacks
    slosh = colour(weight * rng.standard_normal(N), SLOSH)
    # every small contact also keeps the two ends singing
    ends = ring([(CUP_HZ, 0, .11), (LID_HZ, -4, .09)], scatter_db=0)
    steel = signal.oaconvolve(ice, ends / np.linalg.norm(ends))[:N]
    return colour(ice, SHAKER_ICE) + slosh + rings + amp(-13.5) * steel


# How long the room's echo lasts at each pitch: f/Hz, t60/s
ROOM_DECAY = [(100, 0.67), (500, 0.59), (2000, 0.56), (6000, 0.046), (15000, 0.4)]


def room(x, size=256):
    """Painted brick walls return a diffuse tail, which dies fastest around 6 kHz."""
    hz, t, z = signal.stft(rng.standard_normal(len(AGE)), SR, nperseg=size)
    decaying = z * fade(t, read(ROOM_DECAY, hz)[:, None])
    tail = signal.istft(decaying, SR, nperseg=size)[1][:len(AGE)]
    tail *= 1 - np.exp(-(AGE / 0.0045) ** 2)  # the echo builds up over a few milliseconds
    return signal.oaconvolve(x, tail / np.linalg.norm(tail))[:N]


def scene():
    """All the sources, with more of the room in the sections heard from further away."""
    direct = scoop() + ice_in_glass() + chatter() + liquid() + hands() + jigger() + shaker()
    *_, room_db = np.transpose(TAKES)
    return (direct + room(by_take(room_db) * direct) + air())[None]


EDGE_HZ = 15850  # upper band limit


def record(dry):
    """Deep bass is cut; the sound dips between sections; peaks clip; then the treble is cut off."""
    gain = np.ones(N)
    for s, *_ in TAKES[1:]:
        # fade out before each join, fade in after it
        gain *= np.clip(np.maximum((s - TIME) / 0.018, (TIME - s) / 0.04), .04, 1)
    lean = signal.sosfilt(signal.butter(3, 36, "high", fs=SR, output="sos"), dry)
    clipped = np.clip(lean * gain, -1, 1)
    band_limit = signal.firwin(401, EDGE_HZ, window=("kaiser", 8), fs=SR)
    return signal.oaconvolve(clipped, band_limit[None], "same")


dry = scene()
out = record(dry)
store_pcm(out)
```